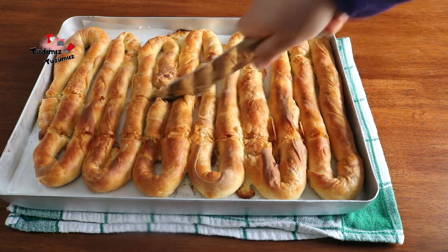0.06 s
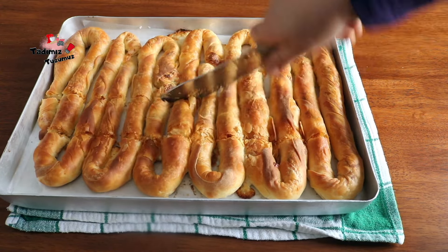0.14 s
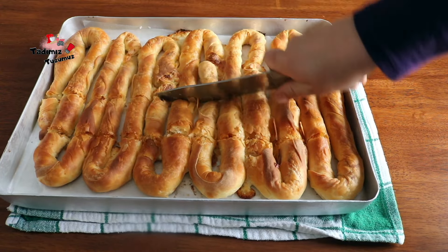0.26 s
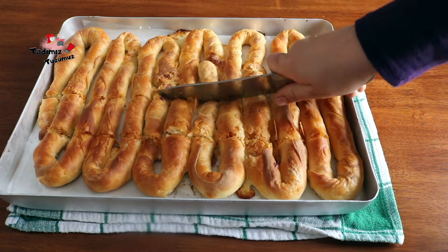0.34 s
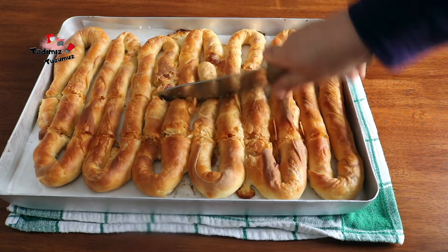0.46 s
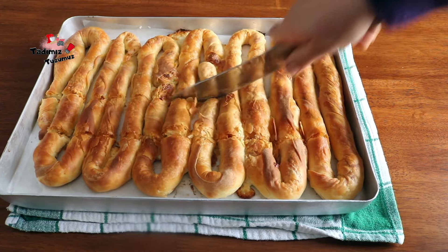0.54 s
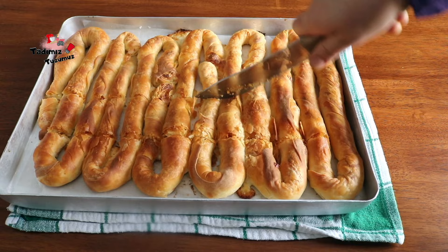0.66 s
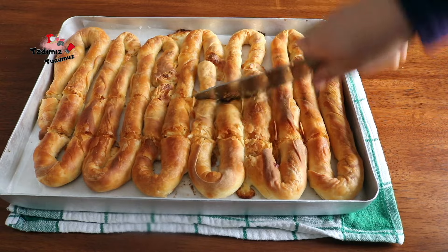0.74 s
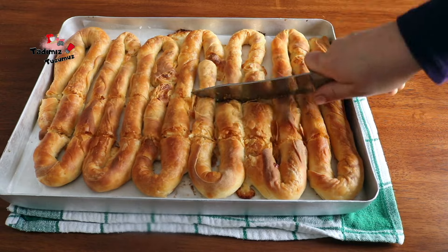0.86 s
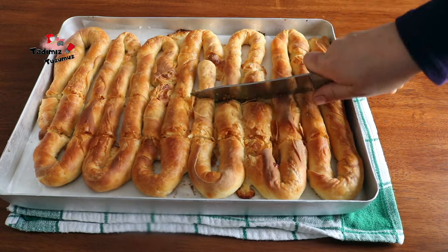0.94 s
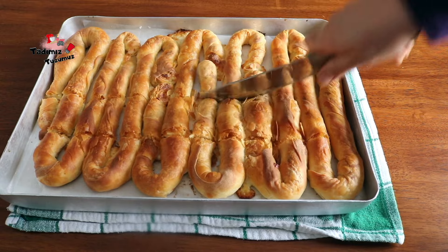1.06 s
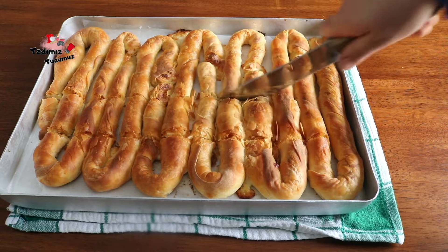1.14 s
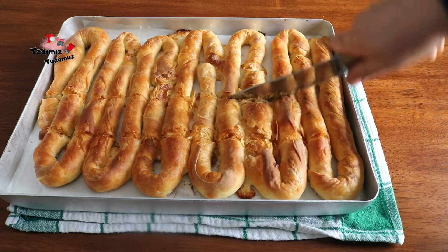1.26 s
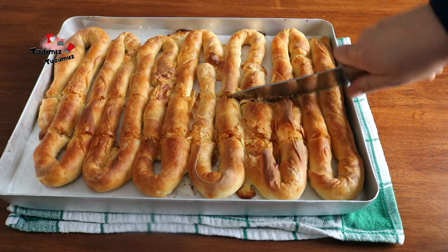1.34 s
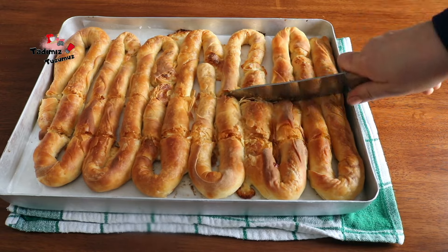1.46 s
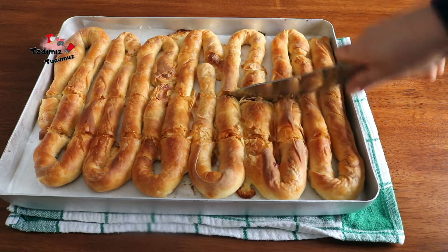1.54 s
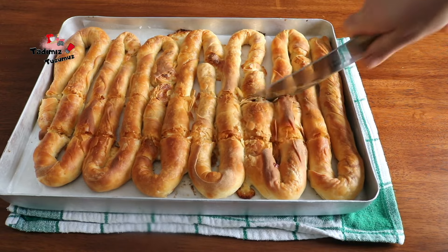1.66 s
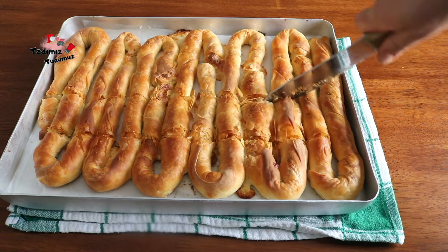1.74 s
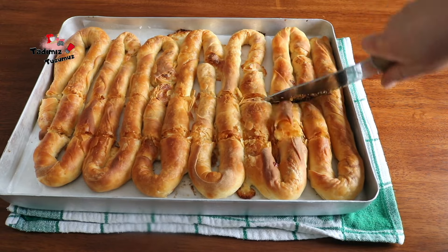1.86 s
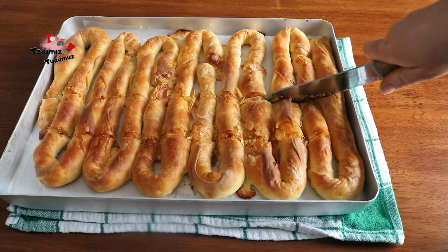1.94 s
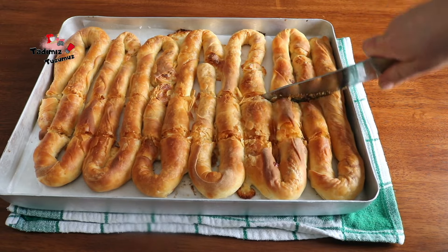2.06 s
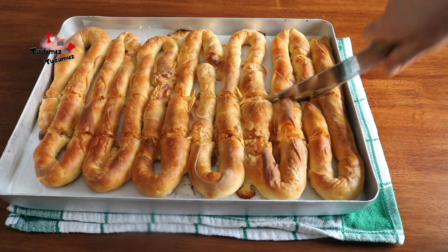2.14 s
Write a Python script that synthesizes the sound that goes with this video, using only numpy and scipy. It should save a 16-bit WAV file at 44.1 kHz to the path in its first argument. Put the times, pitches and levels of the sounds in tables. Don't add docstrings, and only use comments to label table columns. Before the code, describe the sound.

Crisp crust crunches under a sawing blade in four uneven bursts, the second knocking and shuddering the metal tray, the last fading to thin chatter; close stereo microphone, quiet room, faint hush.

```python
import sys
import numpy as np
from scipy import signal
from scipy.io import wavfile
from scipy.ndimage import uniform_filter1d

SR = 44100
rng = np.random.default_rng(int(sys.argv[2]) if len(sys.argv) > 2 else 0)


def makeup_ratio(level_db):
    decades = np.asarray(level_db, float) / 20
    return 10 ** decades


def materialize(psi):
    bounded = np.clip(np.atleast_2d(psi).T, -1, 1)
    quanta = np.round(bounded * 32767).astype(np.int16)
    wavfile.write(sys.argv[1], SR, quanta)


N = 99225

# [f/Hz, level/dB]
HUSH_SPECTRUM = [(40, -61), (110, -11.5), (190, -1), (420, -7), (800, -8), (3500, -8.5), (9000, -16.5),
                 (13000, -32), (16000, -27)]
# [f/Hz, level/dB]
CRUST_SPECTRUM = [(530, -39), (900, -13), (2360, -3), (2930, -2.5), (3550, -7), (7680, -3.5), (16000, -13)]
CRUNCHES = [(0., 0.2, -49.5, 0, 1), (0.193, 0.12, -35, 5.5, 11), (0.237, 0.022, -17.5, .5, 1.5),
            (0.277, 0.076, -32, 2.5, 20.5), (0.346, 0.032, -39, -1.5, 19), (0.72, 0.015, -29, 4, 21),
            (0.733, 0.066, -29.5, -0.8, 8), (0.787, 0.029, -22.5, -0.5, 0), (0.834, 0.09, -35.5, 2.5, 18),
            (0.95, 0.011, -63.5, -12.5, 12), (1.051, 0.015, -43, 2, -3), (1.244, 0.15, -32.5, -3, -22),
            (1.307, 0.055, -28, 0, -6.5), (1.369, 0.056, -39.5, 1, -18), (1.433, 0.053, -29.5, -1.5, 8),
            (1.499, 0.04, -36.5, -3.5, 6), (1.526, 0.08, -52.5, -9.5, -10.5), (1.609, 0.3, -56.5, -2, -5),
            (1.79, 0.025, -35.5, -3, 6), (1.806, 0.05, -24.5, -5.5, -35.5), (1.831, 0.031, -40, 9.5, -19),
            (1.918, 0.066, -49.5, -7, 16), (2.086, 0.15, -51.5, -5, -16.5)]
# [t/s, length/s, level/dB, f/Hz, width/Hz]
CHATTER = [(.003, 0.019, -71.5, 8240, 84), (0.062, 0.0067, -63, 14000, 200),
           (0.057, 0.0083, -70.5, 7440, 200), (0.06, 0.019, -71.5, 9050, 90), (0.08, 0.037, -66, 10920, 93),
           (0.519, 0.023, -61.5, 1160, 36), (0.518, 0.016, -71, 2480, 90), (0.53, 0.022, -69, 2740, 120),
           (0.514, .016, -72, 4820, 110), (2.142, 0.048, -63.5, 1500, 260), (0.513, 0.024, -69.5, 730, 61),
           (1.562, 0.04, -62, 3600, 400), (1.52, 0.05, -57, 4600, 400), (1.94, 0.019, -66, 3400, 150),
           (1.97, 0.04, -67, 9950, 300), (1.975, .03, -61, 13700, 900), (1.977, 0.018, -62, 4600, 493),
           (2.095, 0.071, -56, 11900, 300), (2.112, 0.029, -76.5, 5520, 40), (2.095, 0.06, -63, 14700, 300)]
# [t/s, peak level/dB, f/Hz,
# width/Hz, echo level/dB]
SNAPS = [(0.0548, -31, 7500, 4700, 7), (0.1413, -35, 5500, 1500, 0), (0.2027, -18, 8000, 1000, 7),
         (0.2097, -14, 8500, 1800, -1), (0.2124, -16, 8600, 1500, 2), (0.2142, -20, 8800, 1000, 7),
         (0.2221, -19, 8400, 2200, 5), (0.2536, -10, 5900, 2500, 6), (0.2549, -6, 4900, 1700, 2),
         (0.2951, -19, 7800, 2400, 7), (0.3103, -15, 3400, 2500, -1), (0.314, -17, 6700, 3000, 5),
         (0.3516, -21, 6200, 1300, 7), (0.7149, -29, 9500, 1600, 5), (0.7421, -17, 8400, 3100, 5),
         (0.7445, -11, 3400, 1600, 5), (0.7635, -12, 3700, 1200, 5), (0.7655, -19, 4800, 2900, 3),
         (0.8039, -11, 6400, 1700, 7), (0.8077, -12, 5600, 2600, 1), (0.8593, -17, 5000, 2500, -4),
         (0.8818, -11, 7100, 1600, -3), (0.8859, -23, 6100, 2300, 6), (0.9064, -19, 6500, 1300, 4),
         (0.955, -26, 7100, 1000, 3), (0.9918, -24, 7600, 900, 8), (1.1207, -36, 8800, 2200, 1),
         (1.242, -41, 8400, 1500, 21), (1.2466, -26, 4500, 800, 8), (1.2684, -16, 6500, 2600, 5),
              (1.2711, -18, 6500, 2000, 5), (1.2902, -20, 4800, 2300, 7), (1.3035, -22, 6800, 1500, 7),
              (1.3163, -18, 6500, 2800, 5), (1.3248, -12, 5700, 2300, -7), (1.3301, -20, 5100, 2200, 7),
              (1.3611, -20, 5900, 2400, 5), (1.3934, -26, 7500, 1100, 1), (1.4381, -22, 2200, 1400, 2),
              (1.4401, -14, 6500, 2000, -1), (1.4449, -21, 5900, 2600, 5), (1.4654, -16, 4500, 2800, 2),
              (1.5275, -15, 3400, 1000, 4), (1.5744, -25, 3900, 600, 1), (1.8088, -25, 3900, 1700, 9),
              (1.8301, -12, 3200, 900, 5), (1.8366, -11, 3800, 2000, 1), (1.8566, -15, 2800, 1500, -8),
              (1.9419, -26, 4000, 4100, 3), (1.9803, -23, 9600, 5100, 7),
         (0.2605, -13, 6000, 3000, 5),
    (1.2901, -22, 4200, 600, 7),
    (1.8227, -20, 8000, 1200, 2),
    (1.949, -31, 10000, 900, 3),
    (1.9521, -28, 3450, 500, 4),
    (1.7782, -33, 11000, 4000, -9),
]
# [t/s, strength level/dB, boom level/dB, ring time as share of t60]
KNOCKS = [(0.299, -38, 9.5, 0.98), (.358, -29, -20, 1.4), (.76, -10, 2.5, 0.22), (.797, -14.5, -1.5, 0.8),
          (.897, -13.5, 0, 1.2), (1.254, -31.5, 4.5, 2.2), (1.286, -28, -19, 0.46), (1.433, -12, -2.5, 1.5),
          (1.499, -14.5, 0, 1.04), (1.929, -16, 0.5, 0.41), (2.148, -25, -17.5, 0.93)]
# [f/Hz, level/dB, t60/s]
TRAY_MODES = [(120, -15, 0.68), (160.2, -5, 0.5), (204, -6.5, 0.36), (285, -8, 0.47), (405, -4.5, 0.11),
              (492.6, -5.5, 0.22), (619.4, 3, 0.092), (717.2, 2, 0.097), (828, -0.5, 0.17), (929, -3, 0.14),
              (1124, -16.5, 0.05), (1560, -6.5, 0.069), (1817, -5.5, 0.041), (2114, -13.5, 0.074)]
# [t/s, length/s, level/dB, f/Hz]
RUBS = [
    (.79, 0.091, -39.5, 204),
    (0.895, 0.24, -38.5, 199.4),
    (1.465, .19, -34.5, 272),
    (1.971, 0.051, -39.5, 344),
]
# [f/Hz, t60/s]
ROOM_DECAY = [(150, 0.17), (1500, 0.32), (14000, 0.15)]

ECHO_S = 391 / SR
BOOM_HZ, DAMPED_T60_S = 330, 0.2
TRAY_SIDES = makeup_ratio([[0.7], [-0.7]])


def evened(x):
    return x / np.sqrt(np.mean(x ** 2) + 1e-20)


def read(points, hz):
    f, value = np.transpose(points)
    return np.interp(np.log(hz + 1), np.log(f + 1), value)


def add(mix, s, sound):
    part = mix[..., max(round(s * SR), 0):][..., :sound.shape[-1]]
    part += sound[..., :part.shape[-1]]


def ring(x, hz, width_hz):
    r = np.exp(-np.pi * width_hz / SR)
    return signal.lfilter([1, 0, -r], [1, -2 * r * np.cos(2 * np.pi * hz / SR), r * r], x)


def hush():
    frames, hz = N // 256 + 5, np.fft.rfftfreq(1024, 1 / SR)
    a, b, c, d, patches = rng.standard_normal((frames, 513, 5)).T
    patches = uniform_filter1d(patches, size=12, axis=0)
    patches = evened(uniform_filter1d(patches, size=10, axis=1))
    least_same = 0.46
    same = least_same + (1 - least_same) / (1 + (hz / 300) ** 2)
    same = np.clip(same, 0, 1)[:, None]
    left = a + 1j * b
    right = same * left + np.sqrt(1 - same ** 2) * (c + 1j * d)
    z = np.array([left, right]) * makeup_ratio(read(HUSH_SPECTRUM, hz)[:, None] + 2.2 * patches)
    air = signal.istft(z, nperseg=1024, noverlap=768)[1][:, :N]
    return makeup_ratio(-51) * evened(air)


def pressure(hz):
    rise_s, sag_db, fall_db_per_s, deep_hz = 0.012, 10.5, 696, 1443
    t, power = np.arange(0, N + 64, 32) / SR, 0
    for s, hold, db, tilt_db, depth_db in CRUNCHES:
        rise = np.clip((t - s) / rise_s, 0, 1) ** 2
        sag = sag_db * np.clip((t - s) / hold, 0, 1)
        fall = fall_db_per_s * np.maximum(t - s - hold, 0)
        colour_db = tilt_db * np.log2(hz / 5000) + depth_db / (1 + (hz / deep_hz) ** 4)
        power = power + (rise * makeup_ratio(db + colour_db - sag - fall)) ** 2
    return np.interp(np.arange(N) / SR, t, np.sqrt(power))


def crackle(per_s=500, spread_db=4, cycles=2.8, clump_db=3.5, patch_db=4.5, count=28):
    out, bands = np.zeros((2, N)), np.geomspace(1000, 15500, count)
    weight = makeup_ratio(read(CRUST_SPECTRUM, bands)) * np.sqrt(bands)
    clump = makeup_ratio(clump_db * evened(uniform_filter1d(rng.standard_normal(N), size=90)))
    for hz, gain in zip(bands, weight / np.linalg.norm(weight)):
        chance, sign, size, side = rng.random((4, N))
        size_db = spread_db * np.minimum(-np.log(size + 1e-9), 3.2)
        hits = (chance < per_s / SR) * np.sign(sign - 0.5) * makeup_ratio(size_db)
        pan = 2 * side - 1
        hits = hits * np.array([1 + pan, 1 - pan])
        width_hz = np.sqrt(3000 * hz) / cycles
        flakes = evened(ring(ring(hits, hz, width_hz), hz, width_hz))
        patches = np.minimum(evened(uniform_filter1d(sign - 0.5, size=500)), 1.5)
        out += flakes * gain * pressure(hz) * makeup_ratio(patch_db * patches)
    return out * clump


def chatter():
    out, t = np.zeros(N), np.arange(SR // 5) / SR
    for s, length, db, hz, width_hz in CHATTER:
        chance, push = rng.random((2, len(t)))
        swell = np.sin(np.pi * np.clip(t / length, 0, 1) ** 0.67)
        slips = (chance < 900 / SR) * (push - 0.5) * swell
        tone = ring(ring(slips, hz, width_hz), hz, 17.0 * width_hz)
        add(out, s, makeup_ratio(db) * evened(tone) * np.sqrt(0.13 / length))
    return out


def snaps():
    out, t = np.zeros((2, N)), np.arange(-40, 600) / SR
    flakes = SNAPS
    for (s, db, hz, width_hz, echo_db), (phase, side) in zip(flakes, rng.random((80, 2))):
        u = 2 * np.pi * 0.72 * width_hz * t
        shape = np.where(u < 0, np.exp(-u ** 2), 1 / np.cosh(np.minimum(0.8 * u, 50)))
        wave = shape * np.cos(2 * np.pi * hz * t + 2 * (phase - 0.5))
        crumble = evened(ring(rng.standard_normal(len(t)), hz, width_hz))
        wave += 0.12 * (t > -0.0005) * np.exp(-abs(t) / 0.002) * crumble
        pan = 1 + 0.5 * (side - 0.5) * np.array([[1], [-1]])
        add(out, s + t[0], makeup_ratio(db - 0.5) * wave * pan)
        add(out, s + t[0] + ECHO_S, makeup_ratio(db - 0.5 + echo_db) * wave[None])
    return signal.sosfilt(signal.butter(2, 1000, "high", fs=SR, output="sos"), out)


def tray_knocks():
    out, t = np.zeros(N), np.arange(0, 0.4, 1 / SR)
    for (s, db, boom_db, share), draw in zip(KNOCKS, rng.random((30, 2, 16))):
        wave = 0
        for (hz, level, t60), spot, turn in zip(TRAY_MODES, *draw):
            mode_db = level + 8.76 * (spot - 2.5) + boom_db * (hz < BOOM_HZ)
            decay_db = 60 * t / min(t60 * share, DAMPED_T60_S)
            cycles = hz * (1 + 0.05 * (turn - 0.5)) * t + turn
            wave = wave + makeup_ratio(mode_db - decay_db) * np.sin(2 * np.pi * cycles)
        add(out, s, makeup_ratio(db + 1.5) * wave * np.minimum(t / 0.0033, 1))
    return out


def tray_grind():
    push = pressure(1370.0) * makeup_ratio(-10.5)
    grit = (rng.random(N) < 1500 / SR) * rng.standard_normal(N)
    hum = np.zeros(N)
    for hz, level, t60 in TRAY_MODES:
        t60 = min(t60, DAMPED_T60_S)
        steady = ring(grit, hz, 5.4 / t60).std()
        hum += ring(grit * push, hz, 3.45 / t60) / steady * makeup_ratio(level - 36.0 * (hz < BOOM_HZ))
    return hum / 2.44


def rubs():
    out = np.zeros(N)
    for s, length, db, hz in RUBS:
        u = np.linspace(0, 1, round(length * SR))
        noise = rng.standard_normal(SR // 2)
        waver = evened(ring(noise, hz, 47)[SR // 5:][:len(u)])
        note = waver + 0.95 * np.sin(2 * np.pi * hz * length * u)
        edges = np.clip(np.minimum(u / 0.028, (1 - u) / 0.22), 0, 1)
        add(out, s, makeup_ratio(db - 11.5 * u) * edges * note)
    return out


def room(x):
    taps = np.zeros((2, SR // 2))
    at = np.arange(40, SR // 2 - 20, 20) + rng.integers(0, 20, (2, (SR // 2 - 41) // 20))
    np.put_along_axis(taps, at, rng.choice([-1., 1.], at.shape), 1)
    hz, t, z = signal.stft(taps, SR, nperseg=256)
    decay = makeup_ratio(-60 * t / read(ROOM_DECAY, hz)[:, None])
    tail = signal.istft(z * decay, SR, nperseg=256)[1]
    return signal.fftconvolve(x[None], tail / np.linalg.norm(tail[0]), axes=1)[:, :N]


def reflection(crust, metal):
    dull = signal.butter(1, 11000, fs=SR, output="sos")
    crust_back = makeup_ratio(4.5) * signal.sosfiltfilt(dull, crust.mean(0))
    return crust_back + makeup_ratio(-11) * metal * TRAY_SIDES


def scene():
    crust = crackle() + chatter()
    metal = tray_knocks() + tray_grind() + rubs()
    loud = snaps()
    boom = makeup_ratio(-6.0) * room(metal)
    middle = boom.mean(0)
    wide = signal.sosfilt(signal.butter(2, 250.0, "high", fs=SR, output="sos"), boom - middle)
    both = crust + loud + (metal + middle) * TRAY_SIDES + wide
    both = both + makeup_ratio(-6) * room((crust + 0.43 * loud).mean(0))
    add(both, ECHO_S, reflection(crust, metal))
    return both + hush()


def roll_off(x):
    return signal.sosfilt(signal.butter(12, 16840, fs=SR, output="sos"), x)


def record(dry):
    cut = signal.sosfilt(signal.butter(2, 90.0, "high", fs=SR, output="sos"), dry)
    band_limit = signal.firwin(301, 15900, window=("kaiser", 5), fs=SR)
    cut = signal.oaconvolve(cut, band_limit[None], "same")
    return roll_off(cut)


dry = scene()
out = record(dry)
materialize(out)
```